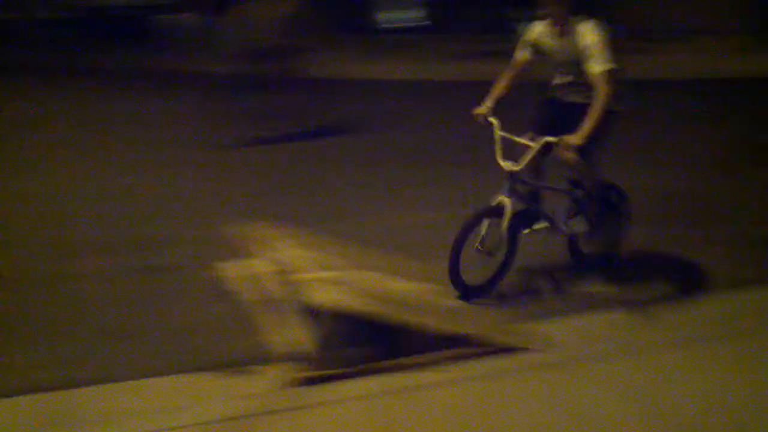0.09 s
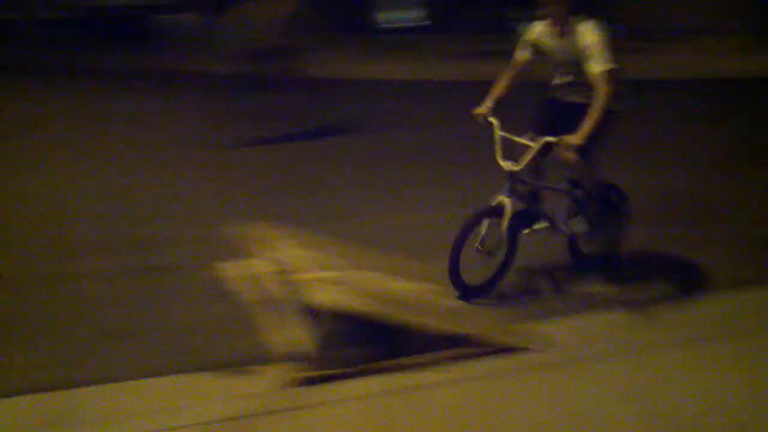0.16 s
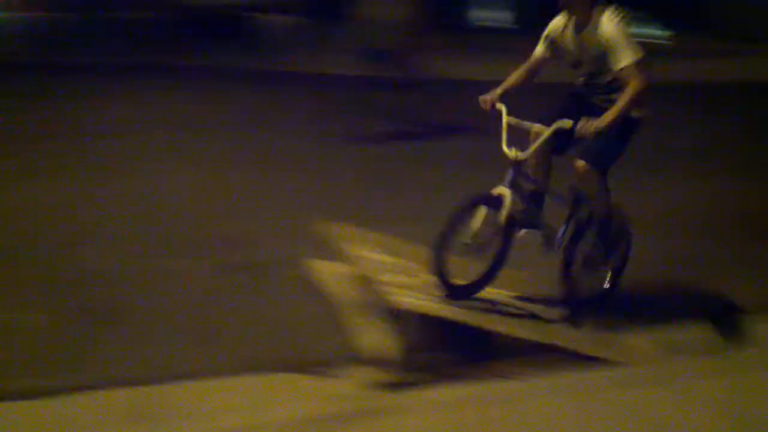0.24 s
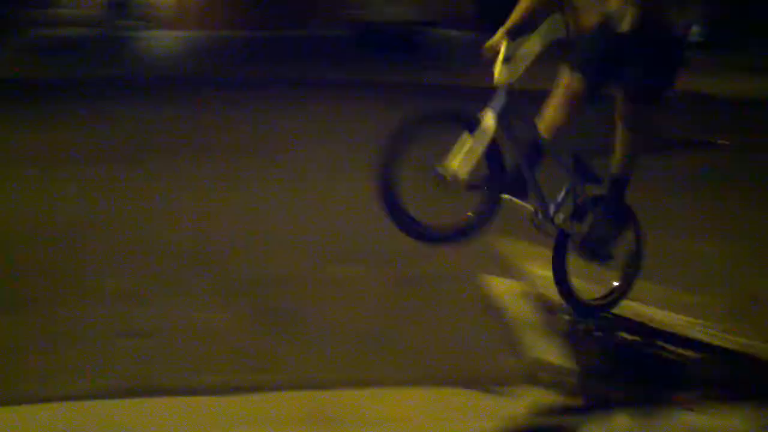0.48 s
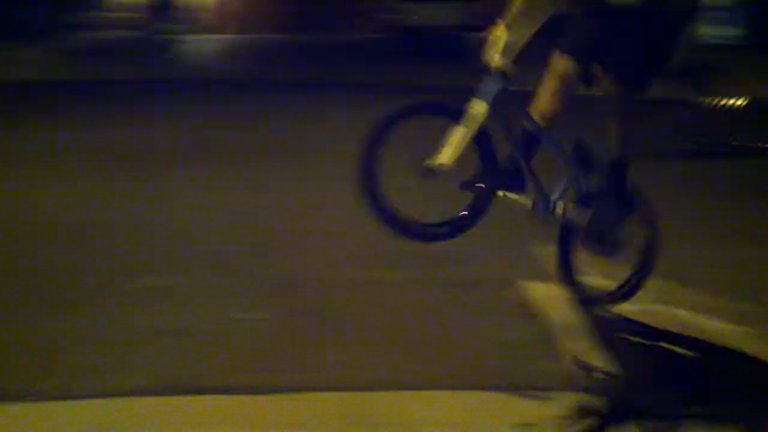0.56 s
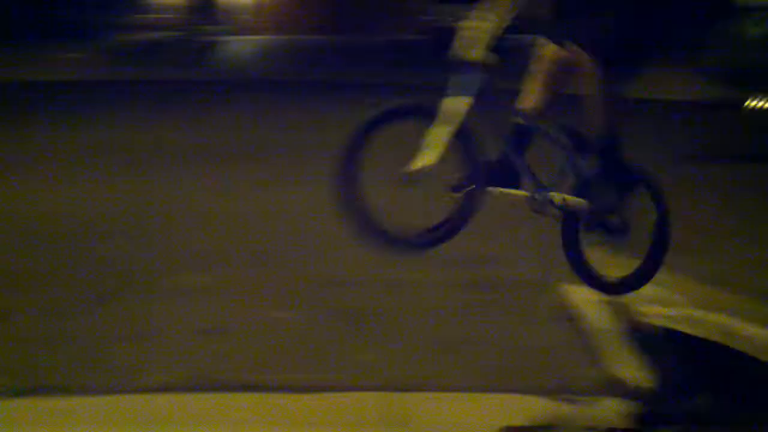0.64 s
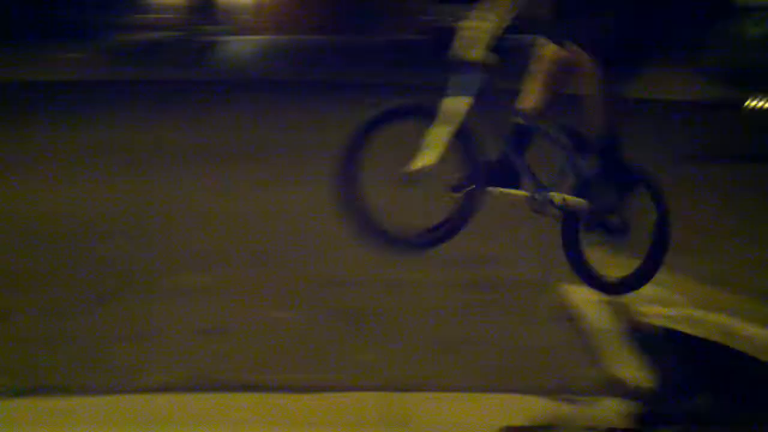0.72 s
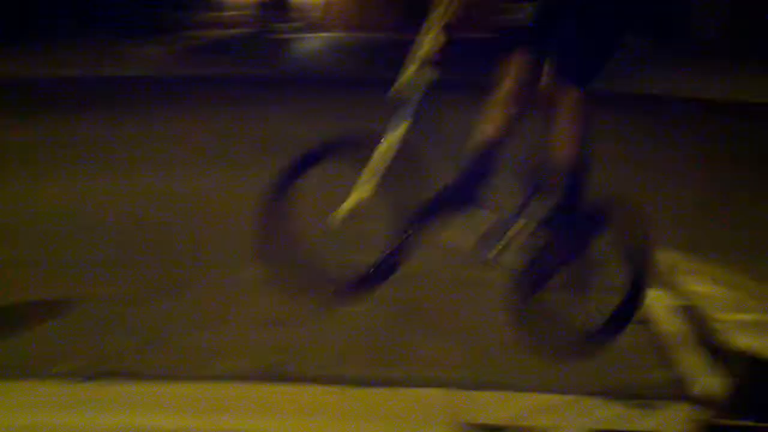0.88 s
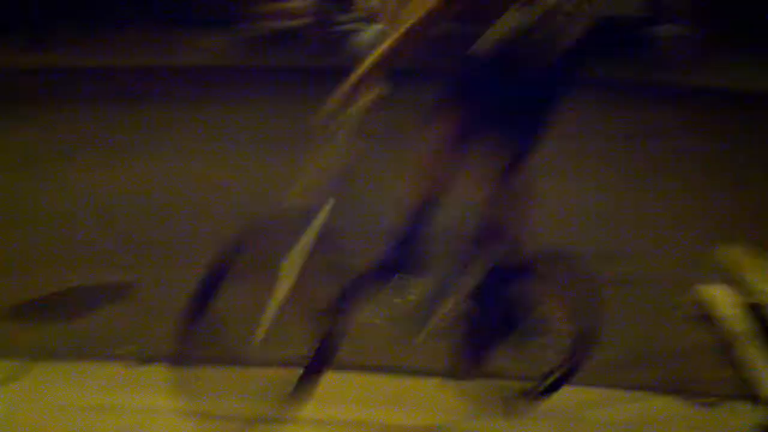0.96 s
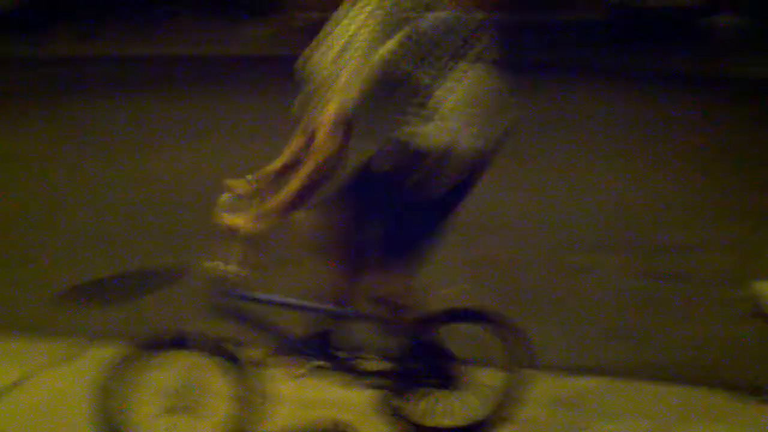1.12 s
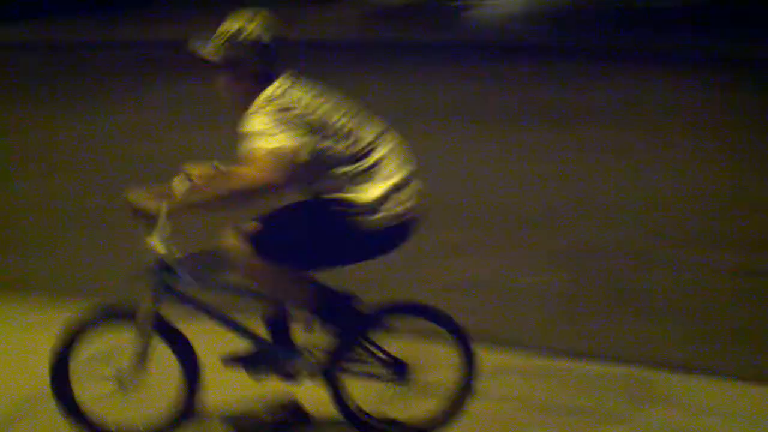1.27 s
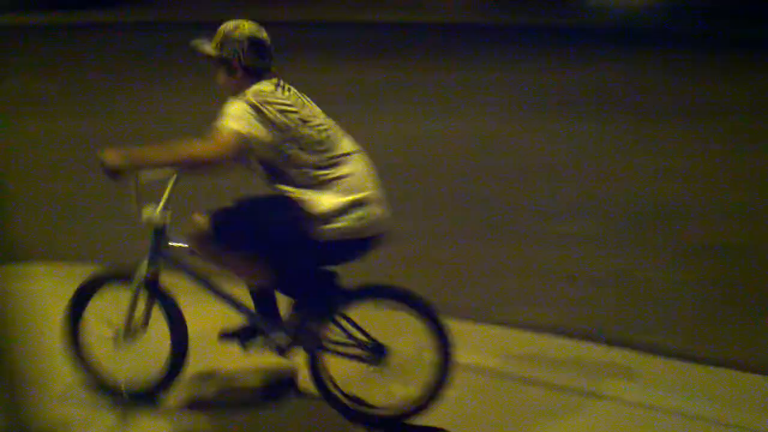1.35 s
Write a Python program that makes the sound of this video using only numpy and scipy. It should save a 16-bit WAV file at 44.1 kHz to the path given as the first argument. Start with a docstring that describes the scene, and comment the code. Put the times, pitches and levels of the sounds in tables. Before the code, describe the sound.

Bicycle wheels clatter over a wooden ramp, then land on pavement with a clank.

```python
"""A small bicycle rides up a plywood ramp: each wheel thumps the deck, loose boards clack, metal cracks.
The freewheel ticks through the jump; the tyres land on the pavement, the frame clanks, the bike coasts on.
Deck, boards, frame and tyres ring as damped modes; cracks, ticks and rolling are shaped noise.
Under it all lie the low hum of a night street and a high hiss, and the street echoes the hits faintly."""
import sys
import numpy as np
from scipy import signal
from scipy.fft import rfft, irfft, next_fast_len
from scipy.io import wavfile
from scipy.ndimage import map_coordinates

SR = 44100
rng = np.random.default_rng(int(sys.argv[2]) if len(sys.argv) > 2 else 0)


def put_to_file(sound):
    """Save the sound as 16-bit audio at rate SR, in the file named by the first command-line argument."""
    columns = np.atleast_2d(sound).T  # one column per channel
    safe = np.clip(columns, -1, 1)
    whole_steps = np.round(safe * 32767)
    wavfile.write(sys.argv[1], SR, whole_steps.astype(np.int16))


N = 61739

# stereo image of far and of near noise: frequency_hz, likeness (1 is mono, -1 or less is antiphase)
FAR_IMAGE = [(60, -1.79), (150, -0.16), (370, 0.29), (1000, 0.96), (1400, 1), (2000, -0.34), (2650, -1.46),
             (3900, 1), (5250, -0.5), (6500, 0.37), (7800, -0.21), (10000, 0.013)]
NEAR_IMAGE = [(60, 0.97), (250, 0.31), (1200, 1), (2000, -0.41), (2650, -1.08), (3900, 0.57), (5250, -1.1),
              (6500, .3), (8000, 0.082), (13000, -0.23)]


def amp(db):
    """Decibels to gain."""
    return 10 ** (np.asarray(db) / 20)


def along(points, hz):
    """Read a curve of frequency_hz, value on a log frequency axis."""
    point_hz, values = np.transpose(points)
    return np.interp(np.log(hz + 1), np.log(point_hz + 1), values)


def fader(points):
    """Draw a curve of time_s, level_db with one value per sample."""
    time_s, level_db = np.transpose(points)
    return np.interp(np.arange(N) / SR, time_s, level_db)


def filtered(x, response):
    """Shape x with a frequency response."""
    size = next_fast_len(N + SR // 4)
    return irfft(rfft(x, size) * response(np.fft.rfftfreq(size, 1 / SR)), size)[..., :N]


def noise(colour, image):
    """Coloured stereo noise of rms 1, its width set per frequency by the image."""
    def mid_side(hz):
        angle = np.arccos(np.clip(along(image, hz), -1, 1)) / 2
        return amp(along(colour, hz)) * [np.cos(angle), np.sin(angle)]

    mid, side = filtered(rng.standard_normal((2, N)), mid_side)
    pair = np.array([mid + side, mid - side])
    return pair / pair.std()


def phase_spread(x, lead_rad):
    """Place a mono sound in stereo: the left side leads the right by the phase lead_rad(hz)."""
    return filtered(x, lambda hz: np.exp(0.5j * lead_rad(hz) * np.array([[1], [-1]])))


def since(start_s):
    """Seconds since start_s, zero before."""
    return np.maximum(np.arange(N) / SR - start_s, 0)


def blow(start_s, rise_s, t60_s):
    """Hit envelope: a quick attack and an exponential decay."""
    t = since(start_s)
    return (1 - np.exp(-t / rise_s)) * np.exp(-np.log(1000) * t / t60_s)


def ring(start_s, modes, rise_s):
    """Strike modes of pitch_hz, level_db, t60_s in alternating polarity, each hit balanced anew."""
    t = since(start_s)
    out = np.zeros(N)
    for k, (hz, db, t60_s) in enumerate(modes):
        gain = (-1) ** k * amp(db + rng.normal(0, 1))
        out += gain * np.sin(2 * np.pi * hz * t) * blow(start_s, rise_s, t60_s)
    return out


def softened(modes, brightness_hz):
    """A soft contact barely excites the modes above its brightness."""
    return [(hz, db - 10 * np.log10(1 + (hz / brightness_hz) ** 4), t60_s) for hz, db, t60_s in modes]


def struck(hits, partials, rise_s):
    """Short, damped rings of one timbre, each at its own pitch."""
    out = np.zeros(N)
    for start_s, db, pitch_hz, t60_s in hits:
        modes = [(pitch_hz * ratio, partial_db, t60_s) for ratio, partial_db in partials]
        out += amp(db) * ring(start_s, modes, rise_s)
    return out


def street_bed():
    """A low street hum and a high hiss that swells and dips."""
    # tone of the hum and of the hiss: frequency_hz, level_db
    hum_colour = [(25, -11), (70, 8.5), (115, 5), (200, 0), (360, 2.5), (650, -7.5), (1050, -8.5),
                  (1500, -16), (2300, -0.5), (4000, -23)]
    hiss_colour = [(1500, -8.5), (2300, 1), (3100, 3.5), (3700, -11), (4400, 2.5), (5300, -6), (6400, -2.5),
                   (7500, 4.5), (9000, 5), (12800, -0.5), (13800, 8), (14200, -6)]
    # swells of the hiss: time_s, level_db
    hiss_levels = [(0, -53), (.06, -51.5), (.3, -51.5), (.46, -67), (.55, -52), (.61, -62.5), (.68, -52),
                   (.75, -48), (.86, -50), (.99, -50), (1.03, -50.5), (1.1, -49.5), (1.24, -52.5),
                   (1.29, -47.5), (1.4, -50)]
    hum = amp(-54.5) * noise(hum_colour, FAR_IMAGE)
    hiss = amp(fader(hiss_levels)) * noise(hiss_colour, FAR_IMAGE)
    return hum + hiss


def street_echo(hits):
    """The street answers the hits with a faint, diffuse tail."""
    colour = [(100, 6), (1300, -1.5), (3000, -15), (12000, -0.5)]  # frequency_hz, level_db
    tail = noise(colour, FAR_IMAGE) * blow(0, rise_s=0.0067, t60_s=0.54)
    send_gain = 3 * amp(-29)
    return send_gain * signal.fftconvolve(hits, tail / np.linalg.norm(tail[0]), axes=1)[:, :N]


def rolling_tyres():
    """Tyre noise, slightly uneven with the ground, that falls away during the jump."""
    # rise and fall of the roll: time_s, level_db
    levels = [(0, -59.5), (.15, -54), (.25, -50), (.32, -45), (.42, -48), (.52, -50.5), (.6, -66),
              (.7, -67), (1.05, -67), (1.12, -52), (1.24, -50.5), (1.4, -55)]
    # tone of the roll: frequency_hz, level_db
    colour = [(30, -37), (80, -2), (160, -1.5), (350, 3), (620, -7), (950, -0.5), (1300, -1), (1700, -10.5),
              (2400, -9), (3500, -11.5), (6000, -14), (9000, -17), (14000, -15.5)]
    bump_samples = 400
    bumps = rng.standard_normal(N // bump_samples + 4)
    bumps_db = map_coordinates(bumps, [np.arange(N) / bump_samples])
    return amp(fader(levels) + bumps_db) * noise(colour, FAR_IMAGE)


def freewheel():
    """Two pawls drop over each ratchet tooth: a short metallic double tick."""
    # runs of ticks: start_s, length_s, first_rate_hz, last_rate_hz, level_db
    runs = [(0.5934, .095, 43.6, 69, -45.5), (0.701, .13, 76, 92, -45), (0.835, .155, 53, 64, -45),
            (0.999, .06, 57, 34, -41), (1.138, .09, 82, 59, -45), (1.245, .155, 56, 81, -41.5)]
    # tone of a tick: frequency_hz, level_db
    colour = [(1200, -17), (2100, -9), (2450, -10), (2780, 2), (3130, -2), (3700, 1.5), (4450, 3.5),
              (5300, 1.5), (6500, 4.5), (7400, 5.5), (8250, 9), (9500, 0.5), (12500, 6), (13800, -4.5)]
    rise_s, t60_s, scatter_db = 0.0008, 0.018, 1.5
    pawl_gap_s, second_pawl_db = 0.0032, 1.5
    envelope = np.zeros(N)
    for start_s, length_s, first_rate_hz, last_rate_hz, db in runs:
        tick_s, end_s = start_s, start_s + length_s
        while tick_s < end_s:
            first_pawl = blow(tick_s, rise_s, t60_s)
            second_pawl = amp(second_pawl_db) * blow(tick_s + pawl_gap_s, rise_s, t60_s)
            envelope += amp(db + rng.normal(0, scatter_db)) * np.hypot(first_pawl, second_pawl)
            tick_s += 1 / np.interp(tick_s, [start_s, end_s], [first_rate_hz, last_rate_hz])
    return envelope * noise(colour, FAR_IMAGE)


def shudder():
    """Countless weak modes of deck and bike blur into noise after the heavy hits."""
    # heavy hits: start_s, level_db, t60_s
    hits = [(0.173, -35, 0.27), (0.344, -31, 0.17), (1.074, -30, 0.15)]
    # body of the shudder: frequency_hz, level_db
    colour = [(30, -26), (70, -33), (130, 0.5), (450, 3.5), (650, -5.5), (950, -5), (1300, -6.5),
              (1700, -13), (2150, -11), (2800, -12), (6000, -24), (14000, -18)]
    envelope = sum(amp(db) * blow(start_s, 0.001, t60_s) for start_s, db, t60_s in hits)
    return envelope * noise(colour, NEAR_IMAGE)


def metal_cracks():
    """Chain and metal parts snap against each other and rattle briefly."""
    # snaps: start_s, level_db, t60_s
    snaps = [(0.167, -37, 0.071), (0.181, -31, 0.022), (0.3309, -24.5, 0.03), (0.3429, -9.5, 0.018),
             (0.3502, -22, 0.0091), (0.45, -39.5, 0.081), (.548, -48, 0.0084), (0.6917, -43, .012),
             (1.0183, -46, 0.01), (1.0596, -21, 0.011), (1.066, -35, 0.094), (1.089, -40, 0.069)]
    # tone of the metal: frequency_hz, level_db
    colour = [(500, -4.5), (1400, -2), (2100, 5), (2700, -6), (4000, -7.5), (5200, -8.5), (6100, -1.5),
              (6600, 3.5), (7200, -8), (8000, -4.5), (9200, 1), (11000, -7.5), (14000, -5.5)]
    envelope = np.zeros(N)
    for start_s, db, t60_s in snaps:
        snap = blow(start_s, rise_s=0.00083, t60_s=t60_s)
        rattle = amp(-32.5) * blow(start_s, rise_s=0.0034, t60_s=0.29)
        envelope += amp(db) * np.hypot(snap, rattle)
    return envelope * noise(colour, NEAR_IMAGE)


def frame_clanks():
    """The landing jolts the frame into a short metallic ring."""
    # jolts: start_s, level_db, brightness_hz
    jolts = [(1.0607, -16, 1720), (1.0733, -13.5, 6000), (1.174, -35, 5980)]
    # modes of the frame: pitch_hz, level_db, t60_s
    modes = [(1090, -19, 0.011), (1300, -10.5, 0.023), (1520, -20, 0.021), (2120, -10, 0.027),
             (2280, -8.5, 0.028), (2660, -13, 0.0053), (3130, -9, 0.013), (3860, -10, 0.0092)]
    # phase lead of the left microphone: frequency_hz, lead_rad
    left_lead = [(1400, 0.057), (2300, 2.68), (2650, 3.2), (3900, 0.23)]
    clanks = sum(amp(db) * ring(start_s, softened(modes, brightness_hz), rise_s=0.0002)
                 for start_s, db, brightness_hz in jolts)
    return phase_spread(clanks, lambda hz: along(left_lead, hz))


def tyre_slap():
    """One sharp pressure pulse as the first tyre meets the ground."""
    start_s, level_db, length_s = 1.0604, -17, 0.00016
    age = since(start_s) / length_s
    return amp(level_db) * (age > 0) * (1 - age) * np.exp(-age)


def tyre_thuds():
    """The tyres thud on the pavement off to one side, reaching the right a moment late."""
    # touchdowns: start_s, level_db, pitch_hz, t60_s
    touchdowns = [(1.0602, -27.5, 330, 0.031), (1.074, -32, 295, 0.069), (1.1048, -27, 446, 0.056),
                  (1.163, -39, 330, 0.041), (1.226, -49.5, 208, 0.17)]
    # partials of a tyre: pitch_ratio, level_db
    partials = [(.55, -1.5), (1, 1), (1.25, -6.5), (1.8, -32)]
    right_lag_s = 0.00043
    thuds = struck(touchdowns, partials, rise_s=0.0018)
    return phase_spread(thuds, lambda hz: 2 * np.pi * hz * right_lag_s)


def board_clacks():
    """Loose boards and parts knock together, dry and short."""
    # knocks: start_s, level_db, pitch_hz, t60_s
    knocks = [(.1712, -19, 990, .04), (.182, -31, 1120, .03), (.2365, -35, 830, .035),
              (.3315, -29, 1300, .025), (.3452, -12, 1120, .028), (.365, -32, 1200, .035),
              (.3805, -30, 860, .04), (.449, -39, 1230, .035), (.7698, -33, 960, .012),
              (1.272, -39, 1250, .014), (1.3103, -24, 1120, .016)]
    # partials of a knock: pitch_ratio, level_db
    partials = [(.8, -15), (0.998, -2), (1.171, -18.5), (1.85, -20.5)]
    return struck(knocks, partials, rise_s=0.00066)


def ramp_thumps():
    """The wheels pound the plywood deck and set its low modes ringing."""
    # wheel hits: start_s, level_db, brightness_hz, left_over_right_db
    thumps = [(0.169, -30.5, 368, 3.5), (0.1773, -20, 240, 4), (0.1902, -27.5, 450, 2.5),
              (0.2212, -34, 362, 4), (0.2365, -33, 583, 3.0), (0.2443, -42, 400, 5),
              (0.3308, -26.0, 378, 2), (0.3465, -34, 290, 15), (0.3524, -24.5, 580, 2.5),
              (0.373, -28, 506, -1.5), (0.3799, -28, 738, 2.0), (0.3935, -29.5, 151, 2.0),
              (0.4412, -43, 313, 3.0), (0.4862, -45.5, 244, 15), (0.5019, -41.5, 375, 11),
              (0.5085, -43.5, 714, 10), (0.5284, -47, 620, 14.5), (0.5408, -41, 540, 10)]
    # modes of the deck: pitch_hz, level_db, t60_s
    modes = [(106.6, -17, 0.11), (161, -7, 0.069), (222, -3, 0.088), (269.6, -4.5, 0.17), (344, 1.5, 0.065),
             (417.7, -1.5, 0.083), (519, -0.5, 0.057), (803, -5, 0.052), (883, -8, 0.054),
             (1041, -4.5, .09)]
    out = np.zeros((2, N))
    for start_s, db, brightness_hz, pan_db in thumps:
        stereo_gain = amp([[db + pan_db / 2], [db - pan_db / 2]])
        out += stereo_gain * ring(start_s, softened(modes, brightness_hz), rise_s=0.00044)
    return out


def scene():
    """The ramp and landing hits with their echo, over rolling tyres, street and freewheel."""
    hits = ramp_thumps() + board_clacks() + metal_cracks()
    hits += tyre_slap() + tyre_thuds() + frame_clanks() + shudder()
    return hits + street_echo(hits) + rolling_tyres() + street_bed() + freewheel()


def record(dry):
    """The microphone thins the deep bass, and a steep high cut takes off the very top."""
    low_cut_hz, high_cut_hz = 88, 14000
    thinned = signal.sosfilt(signal.butter(2, low_cut_hz, "high", fs=SR, output="sos"), dry)
    return filtered(thinned, lambda hz: 1 / np.sqrt(1 + (hz / high_cut_hz) ** 200))


dry = scene()
out = record(dry)
put_to_file(out)
```